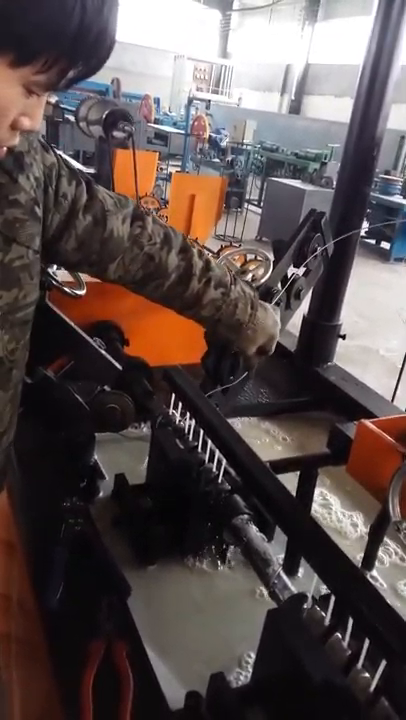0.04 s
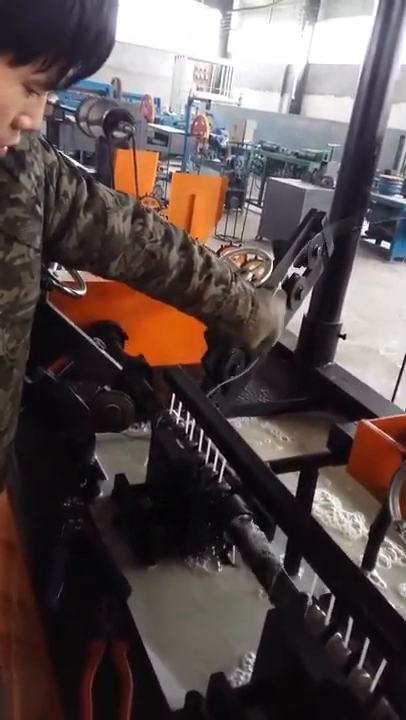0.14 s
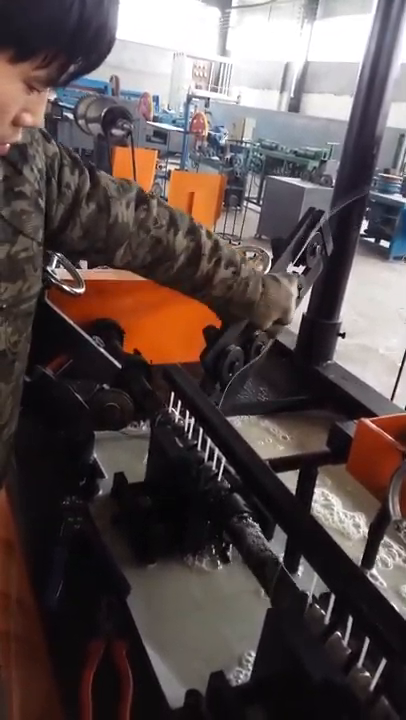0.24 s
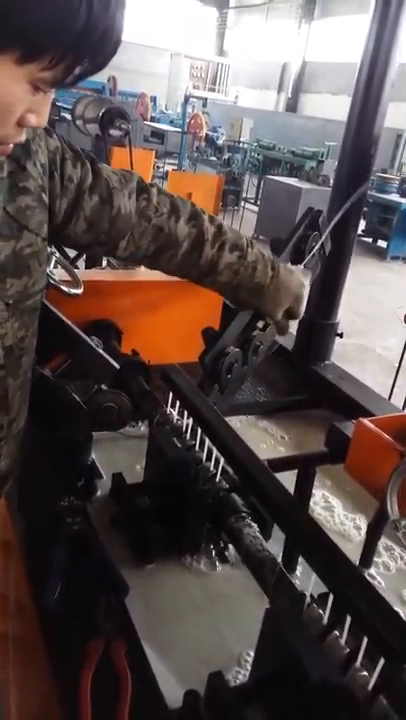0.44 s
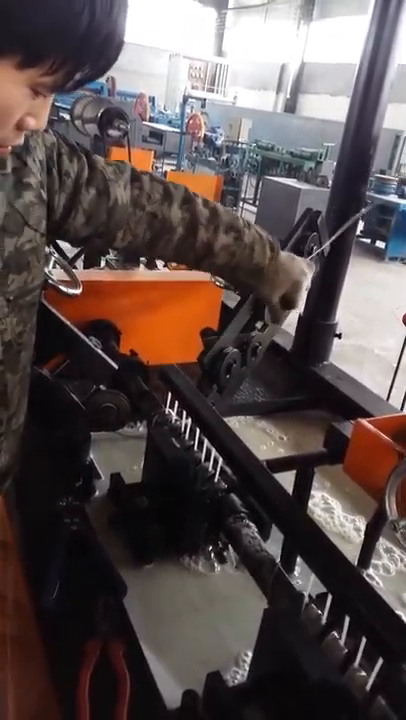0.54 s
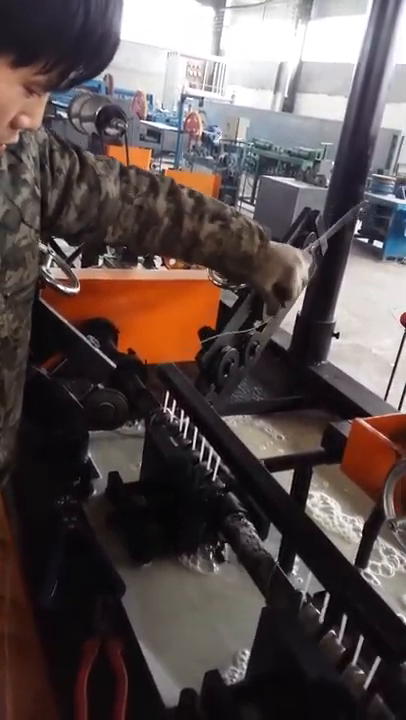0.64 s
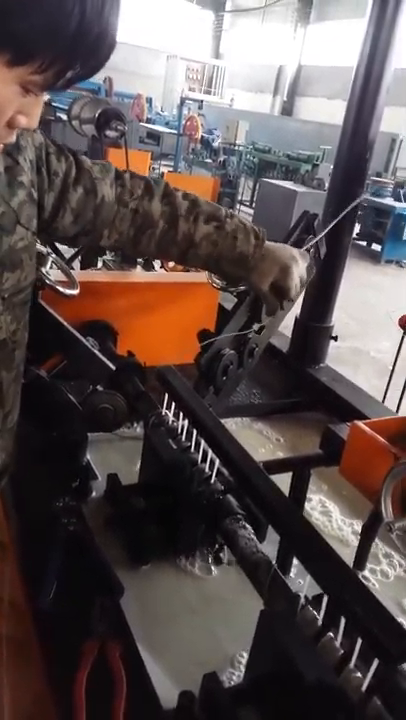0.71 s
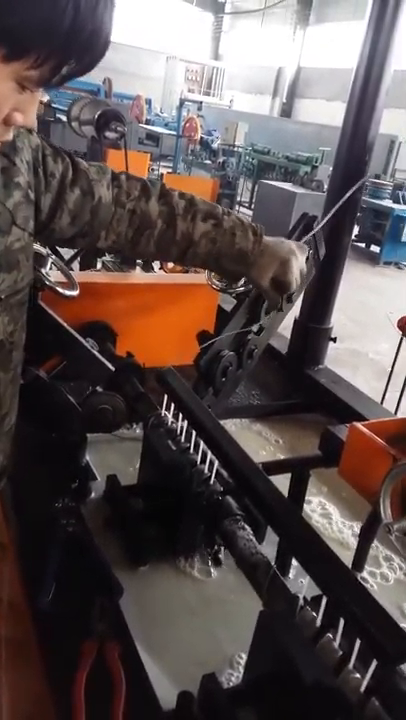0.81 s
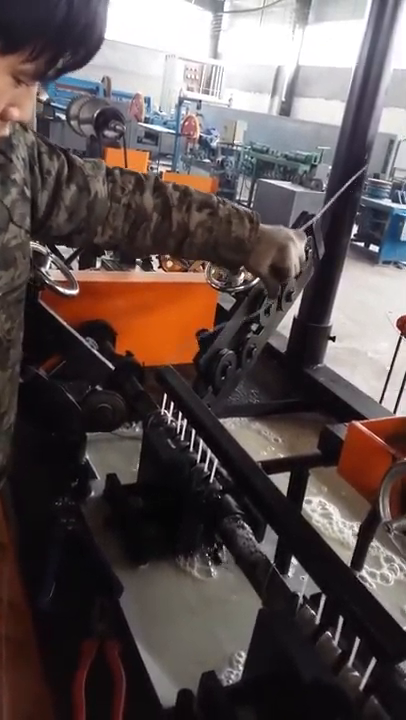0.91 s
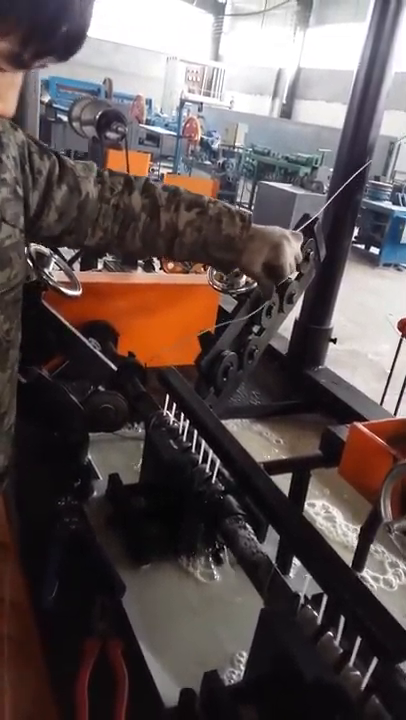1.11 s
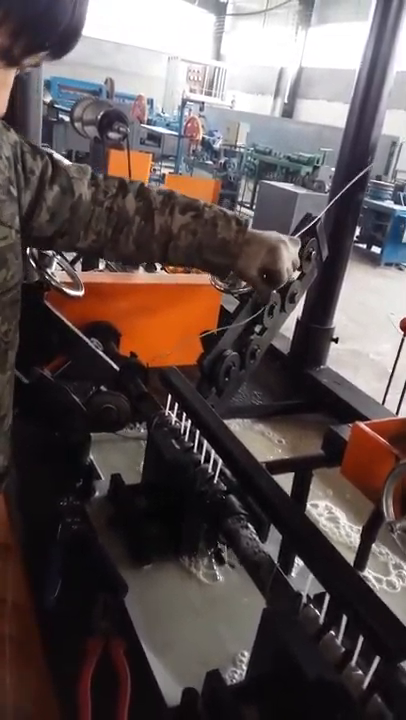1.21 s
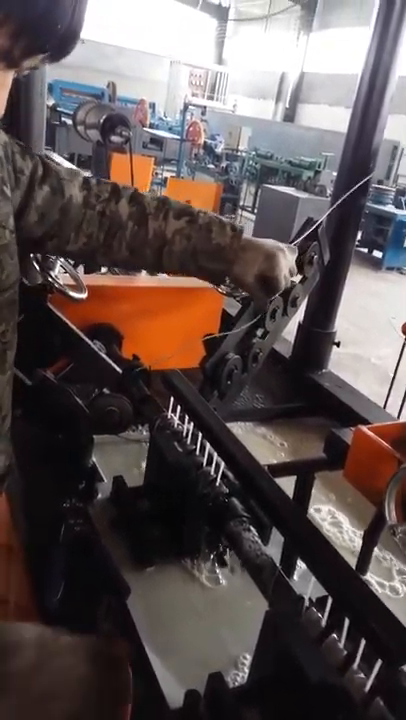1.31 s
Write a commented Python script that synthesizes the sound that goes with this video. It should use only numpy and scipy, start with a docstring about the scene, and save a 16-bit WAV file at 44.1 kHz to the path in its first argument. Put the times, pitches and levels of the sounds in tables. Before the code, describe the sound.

A machine lever slams into its steel stop at about 0.25 seconds, just after a small knock, with a loud ringing clack and a wire ping. Two knocks follow around 0.4, faint wire pings at 0.5 and 0.6, then a catch clicks at 0.65. Two soft knocks fall near 0.9 and 1.05 as the factory hall's echo fades. Motors hum and rumble throughout.

```python
"""A lever on a wire fence machine is thrown over in a large factory hall. Motors hum and rumble throughout. The
lever swings over with a dull knock, then slams into its steel stop with a short chatter: frame and housing
ring, the wire pings, hall and nearby machines answer. Two more knocks follow, the wire pings twice, fainter,
and a catch clicks. Two soft knocks fall in the hall's fading tail."""
import sys
import numpy as np
from scipy import signal
from scipy.io import wavfile

SR = 44100
rng = np.random.default_rng(int(sys.argv[2]) if len(sys.argv) > 2 else 0)


def transcribe(u):
    """Save the signal u as a 16-bit wav file named by the first command-line argument.

    u: samples, shape (n,) or (channels, n), limited to [-1, 1]; the rate is SR.
    q: integer samples, one column per channel.
    """
    v = np.clip(np.atleast_2d(u).T, -1, 1)
    q = np.round(v * 32767).astype(np.int16)
    wavfile.write(sys.argv[1], SR, q)


N = 59535
T = np.arange(N) / SR


def from_db(db):
    """Decibels to gain."""
    return 10 ** (np.asarray(db) / 20)


def pan(db):
    """Left and right gains; positive dB is left."""
    return from_db(np.array([[.5], [-.5]]) * db)


def at_hz(table, hz):
    """Table columns interpolated over log frequency."""
    freqs, *columns = np.transpose(table)
    return [np.interp(np.log(hz), np.log(freqs), column) for column in columns]


def drift(rate_hz):
    """Slow random curve, spread about 1."""
    return np.interp(T * rate_hz, np.arange(256), rng.standard_normal(256))


def swell(rise_s):
    """Smooth rise from 0 to 1."""
    return 1 - np.exp(-(T / rise_s) ** 2)


def delayed(x, delay_s):
    """Stereo delay, cut to N samples."""
    lag = int(np.clip(delay_s * SR, 0, N - 1))
    return np.pad(x, ((0, 0), (lag, 0)))[:, :N]


def high_pass(x, hz):
    """Fourth-order low cut."""
    return signal.sosfilt(signal.butter(4, hz, "high", fs=SR, output="sos"), x)


# diffuse and direct sound: (frequency [Hz], left-right correlation [-])
DIFFUSE_FIELD = [(150, 0.99), (350, 0.84), (700, 0.49), (1300, 0), (4000, 0)]
DIRECT_FIELD = [(200, 0.7), (800, 0.67), (1600, 0), (4000, 0.39)]
def bands(field):
    """Third-octave stereo noise near unit rms; yields (centre [Hz], noise)."""
    edges_hz = 30 * 2 ** (np.arange(28) / 3 * 1.01)
    white = rng.standard_normal((2, 2, N + SR // 4))
    for k, band_hz in enumerate(zip(edges_hz, edges_hz[1:])):
        band_pass = signal.butter(3, band_hz, "band", fs=SR, output="sos")
        pair = signal.sosfilt(band_pass, white[k % 2])[:, -N:]
        mid, side = pair / pair.std(axis=1, keepdims=True)
        hz = np.sqrt(band_hz[0] * band_hz[1])
        corr = np.clip(at_hz(field, hz)[0], -1, 1)
        yield hz, np.sqrt((1 + corr) / 2) * mid + np.sqrt((1 - corr) / 2) * side * [[1], [-1]]


def dense_ring(table, field, rise_s=0, rise_cycles=0.87):
    """Countless close modes as noise bands, each with its own rise and decay."""
    out = np.zeros((2, N))
    for hz, noise in bands(field):
        if hz > table[0][0] * .75:
            db, t60_s, pan_db = at_hz(table, hz)
            envelope = swell(rise_s + rise_cycles / hz) * from_db(db - 60 * T / t60_s)
            out += noise * pan(pan_db) * envelope
    return out


def mode_ring(table, left_lag_s=.00014):
    """Strong single modes as damped sines, reaching the right side first."""
    t = np.maximum(T - np.array([[left_lag_s], [0]]), 0)
    return sum(pan(pan_db) * from_db(db - 60 * t / t60_s) * np.sin(2 * np.pi * hz * t)
               for hz, db, t60_s, pan_db in table)


# rumble and hiss: (frequency [Hz], band level [dB], pan [dB])
RUMBLE_BANDS = [(35, -65, -1), (50.3, -61, 0), (72.4, -46.5, 1.5), (139, -46, 1.5), (270, -48.5, 0),
                (490, -52, -0.5), (770, -56.5, 3), (1430, -53.5, -3.5), (2156, -52, -4.5), (2960, -62.5, 5),
                (4670, -61.5, 11.5), (7030, -73, 5.5), (9900, -81, -2), (15000, -77, 0)]
# hum and drive whine: (frequency [Hz], rms level [dB], pan [dB], left phase lead [rad])
MOTOR_TONES = [(69, -46.5, 1.5, 0), (240.4, -52.5, 0, 0.14), (551.3, -47, -4, 1.3), (637, -63, -8, 0.21),
               (1102, -50.5, -4, 1.82), (1674, -70, -6, 2.1), (2175, -59, 0.5, 1.2), (3857, -69, -15, 1.4),
               (4393, -71.5, 13, 1.4), (7993, -72, 10, 1.1), (8064, -71, -2, 0.8)]
def motors(waver_db=2.5, wander_rad=0.22):
    """Motors hum in slightly wavering tones over steady rumble and hiss."""
    rumble = 0
    for hz, noise in bands(DIFFUSE_FIELD):
        db, pan_db = at_hz(RUMBLE_BANDS, hz)
        rumble += from_db(db) * pan(pan_db) * noise
    hum = 0
    for hz, db, pan_db, lead_rad in MOTOR_TONES:
        phase = 2 * np.pi * (hz * T + rng.random()) + wander_rad * drift(rate_hz=12.6)
        amplitude = np.sqrt(2) * from_db(db + waver_db * drift(rate_hz=10.03))
        hum += amplitude * pan(pan_db) * np.sin(phase + np.array([[lead_rad], [0]]))
    return high_pass(rumble, hz=48) + hum


# knocks: (time [s], gain [dB], pan [dB])
KNOCK_HITS = [(0.2185, -0.5, -2), (0.3909, 2.5, 4), (0.426, 0, -2), (0.876, -9, 2), (1.0412, -8.5, 2)]
# ring of the parts: (frequency [Hz], band level [dB], t60 [s], pan [dB])
KNOCK_BANDS = [(200, -54, 0.11, -4), (800, -35.5, 0.097, 1), (1730, -37, 0.12, -1), (2530, -36, 0.063, -4),
               (4000, -52, 0.038, 16), (12000, -80, .05, 11)]
def knocks():
    """A dull knock as the lever swings over, then loose parts of the linkage knock, each with a short, dull
    ring."""
    ring = dense_ring(KNOCK_BANDS, DIFFUSE_FIELD, rise_s=0.002)
    return sum(from_db(db) * pan(pan_db) * delayed(ring, time_s) for time_s, db, pan_db in KNOCK_HITS)


# lever on stop: (time [s], gain [dB])
STOP_HITS = [(0.2482, -2), (0.251, -3), (0.2568, -9.5)]
# ring of the stop: (frequency [Hz], band level [dB], t60 [s], pan [dB])
STOP_BANDS = [(100, -52, .15, -3), (220, -33.5, 0.17, -3), (453, -32, 0.16, 1), (630, -25, 0.051, 6),
              (920, -12.5, 0.082, 1.5), (1490, -17, 0.026, 18.5), (2700, -16, 0.04, 10),
              (3770, -30, 0.027, 15), (5290, -23, 0.035, 24), (7440, -39.5, .035, 11.5),
              (15000, -64, .04, 3)]
# steel frame and housing: (frequency [Hz], level [dB], t60 [s], pan [dB])
FRAME_RESONANCES = [(120, -37, 0.42, 2), (236.7, -19.5, 0.38, 0), (377.5, -26.5, 0.37, -9),
                    (550, -16, 0.15, 8), (602, -27.5, 0.16, 7), (745, -20.5, 0.11, 1), (761, -7, 0.12, 5.5),
                    (870.6, -20, 0.23, 6), (905, -22, 0.2, 7), (999, -22.5, 0.23, -12),
                    (1060, -18.5, 0.21, -3), (1233, -26, 0.089, -13), (1405, -14.5, 0.08, 3),
                    (1960, -32, 0.15, 5), (2416, -29, 0.25, -21.5), (4870, -39.5, .1, 8)]
HOUSING_RESONANCES = [(231.4, -28, 1.38, 0), (385.2, -31.5, 1.56, -7), (937, -33, 1, -9),
                      (2600, -39, 0.76, -14)]
def lever(frame_rise_s=0.0018):
    """The lever chatters on its stop; the first blow excites frame, housing and hall."""
    chatter = sum(from_db(db) * delayed(dense_ring(STOP_BANDS, DIRECT_FIELD), time_s)
                  for time_s, db in STOP_HITS)
    frame = mode_ring(FRAME_RESONANCES) * (1 - np.exp(-T / frame_rise_s))
    housing = mode_ring(HOUSING_RESONANCES) * swell(rise_s=0.075)
    slam_s = STOP_HITS[0][0]
    return chatter + delayed(frame + housing + hall(), slam_s)


# wire touches: (time [s], frequency [Hz], ping level [dB], ping t60 [s], tick level [dB])
WIRE_PINGS = [(0.2544, 6816, -30, 0.068, -53), (0.4777, 6660, -37.5, 0.058, -54),
              (0.5783, 6770, -41, 0.065, -62)]
def wire(mode_split=0.011, tick_t60_s=0.027):
    """Each touch gives a bright contact tick and a ping of two close modes."""
    out = 0
    for time_s, hz, db, t60_s, tick_db in WIRE_PINGS:
        modes = np.sin(2 * np.pi * hz * T) + .5 * np.sin(2 * np.pi * hz * (1 + mode_split) * T)
        ping = modes * swell(rise_s=0.0025) * from_db(db - 60 * T / t60_s)
        tick = high_pass(rng.standard_normal(N), hz=3000) * from_db(tick_db - 60 * T / tick_t60_s)
        out += delayed(pan(db=20) * (ping + tick), time_s)
    return out


# reverberation: (frequency [Hz], band level [dB], t60 [s], pan [dB])
HALL_BANDS = [(70, -47, 3, 3.5), (230, -34.5, 1.88, -0.5), (365, -34, 1.15, 4), (600, -38, 1.48, 0),
              (900, -26.5, 0.93, 4), (1270, -38, 1.28, 0), (1870, -32, 1.6, -4.5), (2350, -33, 1.45, -9.5),
              (3290, -44.5, 1.43, 4), (4980, -44.5, 1.26, 13.5), (8000, -60.5, 1.62, 16.5),
              (15000, -62, 0.72, 12)]
def hall(rise_s=0.0056):
    """Long diffuse tail after a blow."""
    tail = dense_ring(HALL_BANDS, DIFFUSE_FIELD) * (1 - np.exp(-T / rise_s))
    return delayed(tail, delay_s=.012)


# early reflections: (frequency [Hz], band level [dB], t60 [s], pan [dB])
REFLECTION_BANDS = [(170, -38, 0.29, -5), (400, -31.5, 0.12, -17), (654, -36, 0.17, 1), (930, -24, 0.21, 9),
                    (1500, -35, 0.071, -6), (2350, -23.5, 0.14, -11), (3470, -45.5, .12, 16),
                    (5950, -47.5, 0.084, 16), (12000, -75, 0.089, 6)]
def reflections(time_s=.276):
    """Nearby machines throw the slam back."""
    return delayed(dense_ring(REFLECTION_BANDS, DIFFUSE_FIELD, rise_s=0.0016), time_s)


# dense ring and single modes of the catch: (frequency [Hz], level [dB], t60 [s], pan [dB])
CATCH_BANDS = [(500, -42, 0.045, -12), (1350, -38, 0.096, 5), (2280, -35.5, 0.052, -16),
               (3970, -35.5, 0.042, 15.5), (7040, -45.5, 0.051, 16), (10900, -53.5, 0.078, 13),
               (15000, -55, 0.039, 12)]
CATCH_RESONANCES = [(1321, -44, 0.09, 0), (2200, -29.5, 0.071, 2), (2380, -31.5, 0.059, 9.5),
                    (3970, -30.5, 0.078, 6), (9500, -52, 0.22, 16)]
def catch(time_s=.6448):
    """A small steel catch drops in: bright click, thin hall tail."""
    click = dense_ring(CATCH_BANDS, DIRECT_FIELD) + mode_ring(CATCH_RESONANCES)
    tail = from_db(-15) * high_pass(hall(), hz=1450)
    return delayed(click + tail, time_s)


def scene():
    """The machine in its hall."""
    return motors() + knocks() + lever() + wire() + reflections() + catch()


def record(dry, stopband_hz=16700):
    """Soft clip, then a steep low-pass."""
    low_pass = signal.cheby2(16, 70, stopband_hz, fs=SR, output="sos")
    return signal.sosfilt(low_pass, np.tanh(dry))


dry = scene()
out = record(dry)
transcribe(out)
```